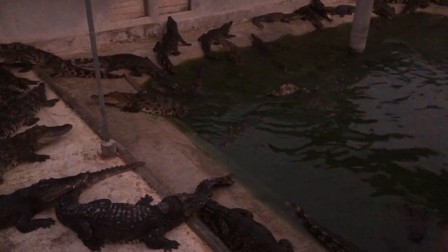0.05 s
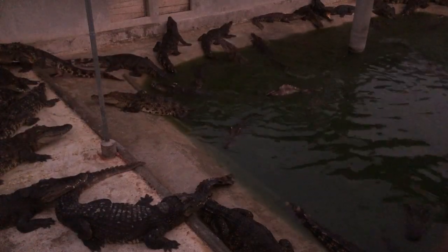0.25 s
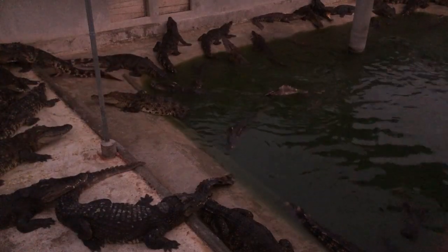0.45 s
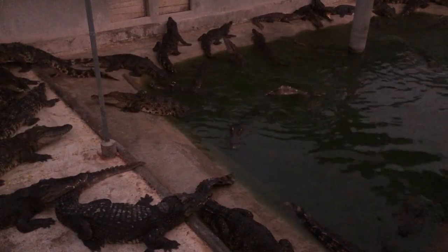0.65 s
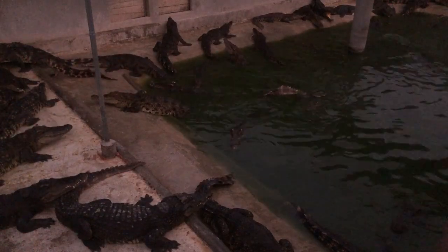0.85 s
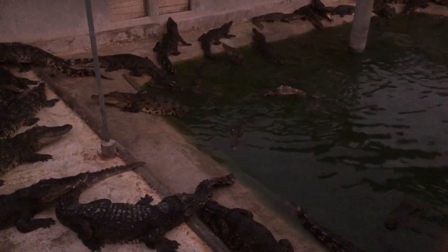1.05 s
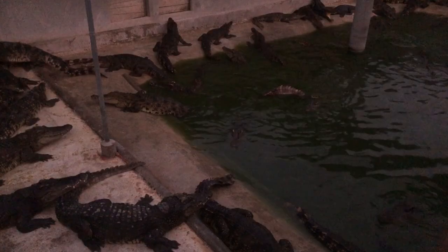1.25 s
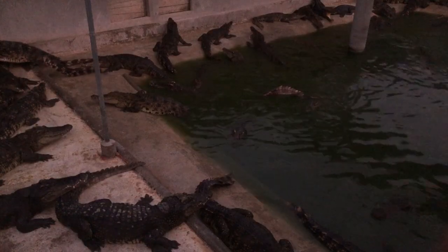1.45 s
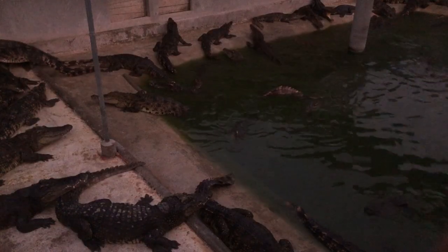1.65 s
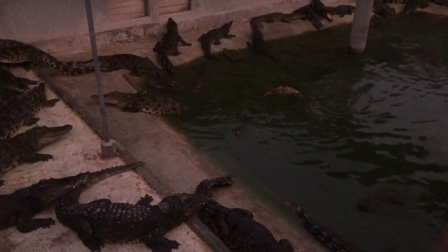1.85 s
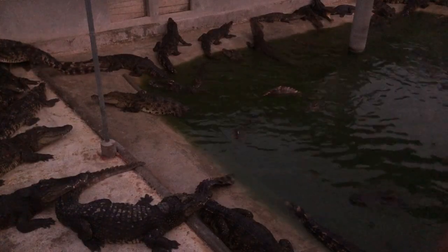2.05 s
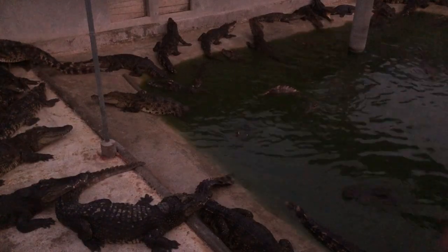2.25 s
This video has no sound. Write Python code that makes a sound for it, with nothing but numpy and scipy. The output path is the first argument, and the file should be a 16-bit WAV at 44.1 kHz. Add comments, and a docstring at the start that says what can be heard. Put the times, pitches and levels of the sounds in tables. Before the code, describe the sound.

Sharp jaw snaps from nearby crocodiles come in a quick, uneven run with soft body thumps, then return weakly. Around them, pool water washes, swishes and gurgles in a concrete enclosure while birds chirp faintly far off.

```python
"""A steady wash of water and a low rumble, with small birds chirping far off; then, near the
microphone, crocodiles snap their jaws beside the pool of a concrete enclosure. Each snap is a short
crackle of teeth with a bony knock and a ringing jaw. Heavy bodies thump, and as the animals move
the water swishes with droplets and bubbles, gurgles and drips. The concrete adds a short tail."""
import sys
import numpy as np
from scipy import signal
from scipy.fft import rfft, irfft
from scipy.io import wavfile
from scipy.ndimage import uniform_filter1d

SR = 44100
rng = np.random.default_rng(int(sys.argv[2]) if len(sys.argv) > 2 else 0)


def master_out(mix):
    """Clip the mix to full scale and print it as 16-bit PCM to the path in sys.argv[1]."""
    frames = np.transpose(np.atleast_2d(mix))
    ceiling = np.clip(frames, -1, 1)
    pcm = np.round(ceiling * 32767).astype(np.int16)
    wavfile.write(sys.argv[1], SR, pcm)


N = 101429

# spectrum of the water wash and rumble: frequency_hz, relative_db
WASH_SPECTRUM = [(15, -56), (25, -33), (53, 12), (76, 1.5), (249, -3), (463, -7.5), (531, -8.5),
                 (591, -14.5), (659, -12), (1520, -13.5), (2480, -11), (4610, -12), (7920, -18.5),
                 (14800, -22.5), (16000, -17.5)]
# how far the wash drifts in level: frequency_hz, depth_db
WASH_DRIFT = [(80, 0.1), (400, 1.), (2000, 3.66), (5000, 1.5), (14000, 3.6)]
# reverberation of the concrete enclosure: frequency_hz, t60_s
ENCLOSURE_DECAY = [(150, 0.9), (1000, 0.57), (4000, 0.26), (14000, 0.47)]
# distant birds: start_s, length_s, pitch_hz, level_db, lower_partial_db
BIRD_CHIRPS = [(.005, 0.0072, 4330, -52.5, -53.5), (0.074, .036, 4450, -52.5, -57),
               (0.14, 0.0081, 4370, -51, -54.5), (0.966, 0.011, 4700, -54.5, -59),
               (1.001, .009, 4560, -50.5, -58.5), (1.089, 0.0077, 4400, -51.5, -55.5),
               (1.445, 0.0067, 4660, -54, -55.5), (1.564, 0.0074, 4560, -53.5, -55.5),
               (1.658, 0.0069, 4830, -52, -58), (1.742, 0.0061, 4600, -50, -60),
               (1.855, 0.0084, 4630, -55.5, -52.5), (1.984, 0.014, 5710, -49.5, -73),
               (2.139, 0.029, 3760, -52, -67), (2.269, 0.0071, 4900, -55, -65.5)]
# air pockets in the pool: start_s, length_s, start_hz, end_hz, level_db
AIR_POCKETS = [(0.054, 0.038, 836, 780, -57), (0.312, 0.0666, 380, 350, -57),
               (0.372, 0.0407, 233, 345, -45.5), (0.401, 0.0345, 343, 404, -44.5),
               (.415, 0.044, 480, 533, -54), (0.47, .03, 416, 460, -46), (0.472, 0.043, 721, 857, -57),
               (0.529, 0.0554, 413, 288, -52), (1.086, 0.029, 1054, 967, -52.5),
               (1.098, 0.023, 596, 590, -53), (1.167, 0.033, 544, 595, -53)]
# single drips: start_s, relative_db, centre_hz
POOL_DRIPS = [(.336, -36.5, 9200), (0.685, -45.5, 3050), (1.2156, -43.5, 6000), (1.2745, -44, 2500),
              (1.3054, -43.5, 7050), (2.054, -40, 2700)]
# water stirred by the animals: peak_s, rise_s, fall_s, body_db, splash_db, spray_db
WATER_SWISHES = [(.01, .02, .04, -55.5, -77, -78), (.205, 0.028, 0.048, -53, -48, -51.5),
                 (0.301, 0.012, 0.046, -49, -55, -44.5), (.378, 0.063, 0.097, -47.5, -45, -42.5),
                 (0.451, 0.0058, 0.0084, -40.5, -37.5, -50), (.505, 0.038, 0.12, -49, -46, -52.5),
                 (.665, 0.081, 0.099, -60, -51, -53), (.825, 0.033, 0.11, -51, -50.5, -58),
                 (1.185, 0.031, 0.05, -43.5, -47.5, -49.5), (1.273, 0.0079, 0.12, -50, -55.5, -58),
                 (1.389, 0.0071, 0.005, -46, -49, -53), (1.485, 0.028, 0.038, -59.5, -63, -59),
                 (1.651, 0.023, 0.039, -79, -53.5, -55.5), (1.775, 0.0078, 0.029, -68, -50.5, -53),
                 (1.927, 0.014, 0.019, -78, -49, -66), (1.99, 0.051, 0.035, -78, -51, -51.5),
                 (2.056, 0.055, 0.13, -50.5, -48.5, -51)]
# body, splash and spray bands of a swish: low_hz, high_hz
SWISH_BANDS = [(450, 2730), (2000, 6900), (6000, 13500)]
# heavy bodies: start_s, relative_db, start_hz, decay_s
BODY_THUMPS = [(0.4662, -34, 229, 0.0054), (0.783, -42, 240, 0.0087), (0.812, -54, 190, 0.0032),
               (1.758, -47.5, 170, 0.0037), (1.866, -45, 110, 0.0053)]
# jaw snaps and clacks:
# start_s, rise_ms, base_decay_ms, bass_db, body_db, bite_db, edge_db, knock_hz, knock_db, ring_db
JAW_SNAPS = [(.2354, 0.24, 1.6, -57, -37.5, -29.5, -30.5, 5110, -18.5, -54),
             (.2390, 0.18, 3.6, -46, -34, -39, -38.5, 1270, -62, -70),
             (.4606, 0.6, 3.4, -44.5, -37.5, -31, -36.5, 1780, -35, -42),
             (0.463, 0.38, 2.3, -37, -34, -29, -24.5, 1026, -18, -32.5),
             (0.4945, 1.1, 3.4, -51, -42, -41, -35.5, 5600, -35, -62),
             (0.6444, 0.43, 2.5, -70, -64, -46, -44.5, 4000, -45, -75),
             (0.6529, 0.34, 2.7, -51.5, -51, -40.5, -40, 2990, -33, -62),
             (0.7795, 0.53, 2.2, -52, -38, -39.5, -40.5, 2870, -19.5, -68),
             (.7800, 1.2, 4.3, -65, -46, -47, -46, 1170, -26, -75),
             (0.8096, 2.4, 1.3, -45, -43.5, -52.5, -50, 750, -30, -72),
             (1.7587, 0.41, 1.8, -58.5, -54, -48, -39, 10970, -36, -74),
             (1.765, 0.36, .5, -61, -58, -55, -54, 11800, -36, -80),
             (1.8285, 0.98, 1.8, -74, -54, -53, -57, 1250, -38.5, -81)]
# bass, body, bite and edge bands of a snap: low_hz, high_hz, lag_ms, decay_ratio
SNAP_BANDS = [(170, 573, 0.7, 2.2), (734, 2270, 0.34, 1.83), (2500, 6140, .1, 1.27),
              (6000, 15200, .1, 1.96)]
# resonances of the jaw: pitch_hz, relative_db, t60_s
JAW_MODES = [(383, 3.5, 0.072), (458, 4.5, 0.064), (990, -9, .035), (1700, -4, 0.025), (3170, 0, 0.012),
             (4100, -14, 0.075), (6200, 14, 0.016), (7100, 5, 0.046), (8950, 5, 0.074), (9230, 4, .02),
             (12200, 9, 0.022)]


def amp(db):
    """Decibels to gain."""
    return 10 ** (np.asarray(db) / 20)


def unit_rms(x):
    """Scales to an rms of one."""
    return x / np.sqrt(np.mean(x ** 2) + 1e-20)


def curve_at(points, hz):
    """Reads a table on a log-frequency axis."""
    table_hz, value = np.transpose(points)
    return np.interp(np.log(hz + 1), np.log(table_hz + 1), value)


def add(mix, start_s, sound):
    """Mixes a sound in at its start time."""
    part = mix[max(round(start_s * SR), 0):][:len(sound)]
    part += sound[:len(part)]


def band(x, low_hz, high_hz, order=3):
    """Band-pass filter."""
    sos = signal.butter(order, [low_hz, min(high_hz, SR / 2 - 1)], "band", fs=SR, output="sos")
    return signal.sosfilt(sos, x)


def glide(length_s, start_hz, end_hz, waver):
    """The rounded envelope and wavering phase of a short gliding tone."""
    progress = np.linspace(0, 1, max(int(length_s * SR), 2))
    wobble = unit_rms(uniform_filter1d(rng.standard_normal(SR // 2), size=60))[:len(progress)]
    hz = (start_hz + (end_hz - start_hz) * progress) * (1 + waver * wobble)
    return np.sqrt(2 * abs(np.sin(np.pi * progress))), 2 * np.pi * np.cumsum(hz) / SR


def crackle(rise_s, decay_s, low_hz, high_hz, spread_db=1.5):
    """A dying cluster of tiny cracks, even across its band, with the energy of 10 ms at rms one."""
    t = np.arange(SR // 10) / SR
    envelope = np.minimum(t / rise_s, 1) * np.exp(-np.maximum(t - rise_s, 0) / decay_s)
    cracks = rng.choice([-1., 1.], len(t)) * amp(spread_db * rng.standard_normal(len(t)))
    spectrum = rfft(cracks * envelope ** 0.75)
    flattened = irfft(spectrum / (abs(spectrum) + 1e-12), len(t))
    return unit_rms(band(flattened * envelope ** 0.25, low_hz, high_hz)) / np.sqrt(10)


def wash(level_db=-52.5):
    """The bed of the place: steady water and rumble, patches of its spectrum drifting in level."""
    hz = np.fft.rfftfreq(2048, 1 / SR)
    real, imag, drift = rng.standard_normal((N // 512 + 5, len(hz), 3)).T
    drift = uniform_filter1d(drift, size=24, axis=0)  # smooth across frequency
    drift = unit_rms(uniform_filter1d(drift, size=4, axis=1))  # and over time
    gain = amp(curve_at(WASH_SPECTRUM, hz)[:, None] + curve_at(WASH_DRIFT, hz)[:, None] * drift)
    noise = signal.istft((real + 1j * imag) * gain, nperseg=2048, noverlap=1536)[1]
    return amp(level_db) * unit_rms(noise[:N])


def enclosure(direct, level_db=-13, build_s=0.014):
    """A diffuse tail off the concrete, the treble dying before the bass."""
    hz, t, noise = signal.stft(rng.standard_normal(SR), SR, nperseg=256)
    decay = np.exp(-np.log(1000) * t / curve_at(ENCLOSURE_DECAY, hz)[:, None])
    tail = signal.istft(noise * decay, SR)[1]
    tail *= np.minimum(np.arange(len(tail)) / SR / build_s, 1)
    return amp(level_db) * signal.fftconvolve(direct, tail / np.linalg.norm(tail))[:N]


def birds(sag_hz_per_s=3000, rasp_depth=0.55, lower_ratio=0.53, lower_lag_s=0.00307):
    """Far off: raspy falling chirps, the lower partial a moment late, and one thin held whistle."""
    out = np.zeros(N)
    for start_s, length_s, hz, db, lower_db in BIRD_CHIRPS:
        sag_hz = sag_hz_per_s * length_s / 2
        envelope, phase = glide(length_s, hz + sag_hz, hz - sag_hz, waver=0.03)
        rasp = unit_rms(band(rng.standard_normal(SR // 5), 150, 510))[:len(envelope)]
        envelope *= 1 + rasp_depth * rasp
        add(out, start_s, amp(db) * envelope * np.sin(phase))
        add(out, start_s + lower_lag_s, amp(lower_db) * envelope * np.sin(lower_ratio * phase))
    envelope, phase = glide(length_s=0.3, start_hz=3730, end_hz=3730, waver=0.02)  # the whistle
    add(out, start_s=2.02, sound=amp(-62) * envelope * np.sin(phase))
    return out


def gurgles(flutter_depth=0.35):
    """Pockets of air ring in the pool, gliding in pitch and fluttering in level."""
    out = np.zeros(N)
    for start_s, length_s, start_hz, end_hz, db in AIR_POCKETS:
        envelope, phase = glide(length_s, start_hz, end_hz, waver=0.089)
        flutter = unit_rms(band(rng.standard_normal(SR // 2), 32, 145))[-len(envelope):]
        add(out, start_s, amp(db) * envelope * (1 + flutter_depth * flutter) * np.sin(phase))
    return out


def drips(decay_s=0.0027):
    """Single drips tick on the surface, each two octaves wide."""
    out = np.zeros(N)
    for start_s, db, hz in POOL_DRIPS:
        add(out, start_s, amp(db) * crackle(decay_s / 2, decay_s, hz / 2, hz * 2) / 2)
    return out


def bubbles(per_s=260, low_hz=501.5, high_hz=2410, decay_cycles=6.9, pitch_rise=0.121):
    """A steady stream of small bubbles, each a dying tone that rises a little."""
    out = np.zeros(N)
    for when, smallness, gain in rng.random((int(per_s * N / SR), 3)):
        hz = low_hz * (high_hz / low_hz) ** smallness
        age = np.arange(SR // 20) / SR * hz / decay_cycles  # in decay times
        ring = np.sin(2 * np.pi * decay_cycles * age * (1 + pitch_rise * age / 2))
        add(out, when * N / SR, gain * np.exp(-age) * np.minimum(10 * age, 1) * ring)
    return unit_rms(out)


def swishes(drops_per_s=2300, drop_spread_db=6.5, drop_share=0.4, bubble_db=-5):
    """Stirred water: hiss and dense droplets swell and die in three bands; bubbles fill the lowest."""
    t, out = np.arange(N) / SR, np.zeros(N)
    drops = rng.standard_normal(N) * (rng.random(N) < drops_per_s / SR)
    drops *= amp(drop_spread_db * np.minimum(rng.exponential(1, N), 2))
    for k, (low_hz, high_hz) in enumerate(SWISH_BANDS):
        power = np.zeros(N)
        for peak_s, rise_s, fall_s, *band_db in WATER_SWISHES:
            swell = np.exp(-np.maximum((peak_s - t) / rise_s, (t - peak_s) / fall_s))
            power += (amp(band_db[k]) * swell) ** 2
        hiss = np.sqrt(1 - drop_share) * rng.standard_normal(N)
        water = unit_rms(band(np.sqrt(drop_share) * unit_rms(drops) + hiss, low_hz, high_hz, order=2))
        if k == 0:
            water = unit_rms(water + amp(bubble_db) * bubbles())
        out += np.sqrt(power) * water
    return out


def thumps(end_hz=59):
    """Dull thumps of heavy bodies, falling in pitch as they die."""
    out = np.zeros(N)
    for start_s, db, start_hz, decay_s in BODY_THUMPS:
        age = np.arange(SR // 10) / SR / decay_s
        hz = end_hz + (start_hz - end_hz) * np.exp(-age / 2)
        envelope = 2 * age * np.exp(-age)
        add(out, start_s, amp(db) * envelope * np.sin(2 * np.pi * np.cumsum(hz) / SR))
    return out


def snaps(knock_peak_s=0.00055):
    """Close by, teeth crack together, bone knocks and the jaw rings; the bass lags and lingers."""
    t, out = np.arange(SR // 10) / SR, np.zeros(N)
    age = t / knock_peak_s
    ring = sum(amp(db - 60 * t / t60_s) * np.sin(2 * np.pi * hz * t) for hz, db, t60_s in JAW_MODES)
    ring *= 1 - np.exp(-age)
    for start_s, rise_ms, decay_ms, *band_db, knock_hz, knock_db, ring_db in JAW_SNAPS:
        for db, (low_hz, high_hz, lag_ms, decay_ratio) in zip(band_db, SNAP_BANDS):
            teeth = crackle(rise_ms / 1000, decay_ms * decay_ratio / 1000, low_hz, high_hz)
            add(out, start_s + lag_ms / 1000, amp(db) * teeth)
        knock = age * np.exp(1 - age) * np.sin(2 * np.pi * knock_hz * t)
        add(out, start_s, amp(knock_db) * knock + amp(ring_db) * ring)
    return out


def scene():
    """One microphone at the poolside: direct sound and its tail off the concrete, over the wash."""
    direct = snaps() + thumps() + swishes() + gurgles() + drips() + birds()
    return (direct + enclosure(direct) + wash())[None]


def record(dry):
    """The microphone signal passes the recorder's low cut and band limit."""
    low_cut_hz, top_hz = 58.6, 15950
    low_cut = signal.butter(3, low_cut_hz, "high", fs=SR, output="sos")
    band_limit = signal.firwin(255, top_hz, window=("kaiser", 7), fs=SR)
    return signal.oaconvolve(signal.sosfilt(low_cut, dry), band_limit[None], "same")


dry = scene()
out = record(dry)
master_out(out)
```